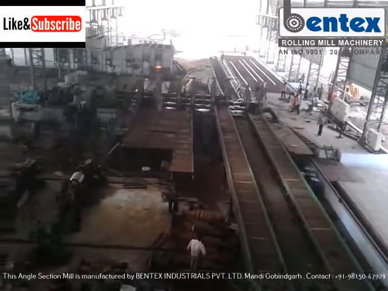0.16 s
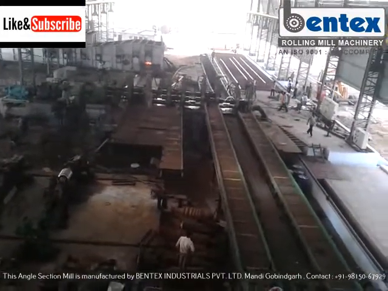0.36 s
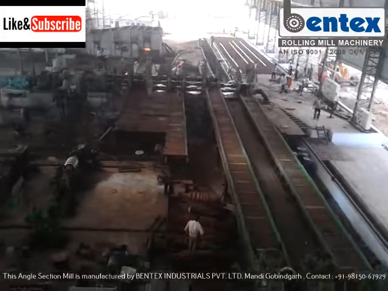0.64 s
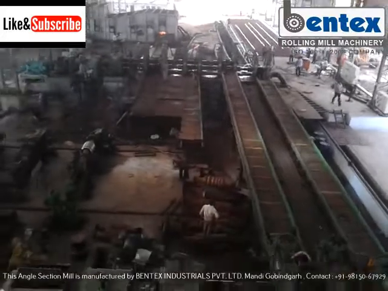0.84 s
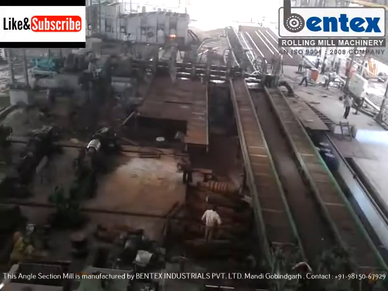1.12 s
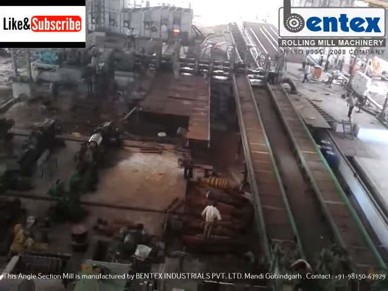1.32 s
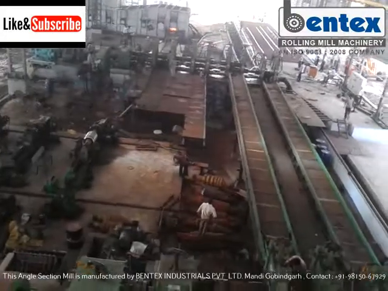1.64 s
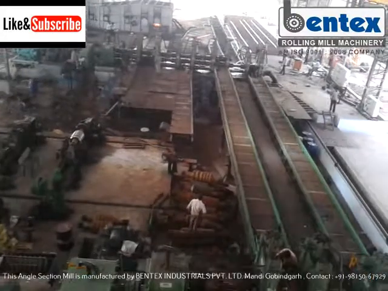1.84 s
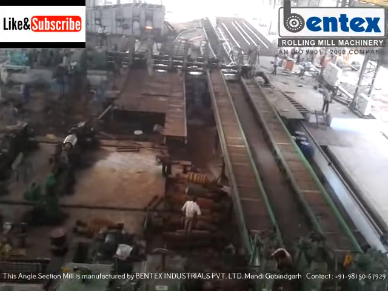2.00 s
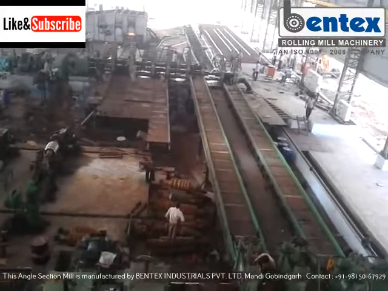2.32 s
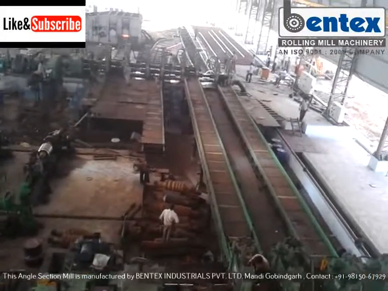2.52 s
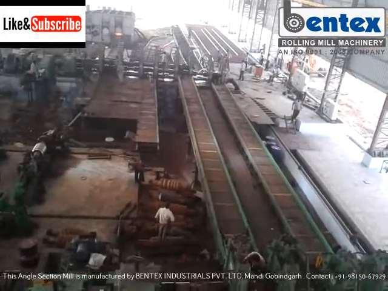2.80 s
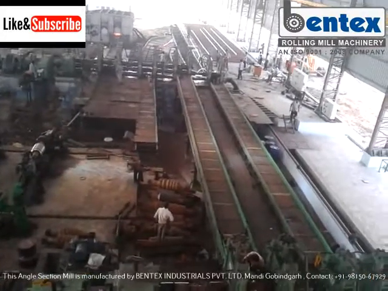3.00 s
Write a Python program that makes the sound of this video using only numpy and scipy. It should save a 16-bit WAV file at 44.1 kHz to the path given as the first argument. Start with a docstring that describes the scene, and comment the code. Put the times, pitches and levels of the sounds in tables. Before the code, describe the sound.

A steel rolling mill roars in a factory hall, with irregular metal clanks and pings.

```python
"""A steel rolling mill runs in a large factory hall, heard from high above the floor.
From the start, stands and conveyors roar, drives hum, cooling spray hisses and small impacts keep
the steel rattling. Dull knocks on the conveyors come in at once, then bright pings of steel on steel.
From 0.2 s on, loose steel clanks about twice a second, some blows in pairs, its modes smeared by
the hall's echoes. All of it passes through a narrow-band recorder that just overloads."""
import sys
import numpy as np
from scipy import signal
from scipy.fft import rfft, irfft, next_fast_len
from scipy.io import wavfile
from scipy.ndimage import uniform_filter1d

SR = 44100
rng = np.random.default_rng(int(sys.argv[2]) if len(sys.argv) > 2 else 0)


def int16_out(signal):
    """Quantize to a 16-bit WAV file."""
    q = np.round(np.clip(np.atleast_2d(signal).T, -1, 1) * 32767)
    wavfile.write(sys.argv[1], SR, q.astype(np.int16))


N = 138915


def amp(db):
    """Amplitude ratio: a factor of ten for every 20 dB."""
    return 10 ** (np.asarray(db) / 20)

def unit(x):
    """Normalisation to rms 1."""
    return x / np.sqrt(np.mean(x ** 2) + 1e-20)

def envelope(points):
    """Amplitude envelope: gain interpolated from (time [s], level [dB])."""
    return amp(np.interp(np.arange(N) / SR, *np.transpose(points)))

def response(spectrum):
    """Spectral envelope: gain as a function of frequency, interpolated on a logarithmic axis."""
    hz, db = np.transpose(spectrum)
    return lambda f: amp(np.interp(np.log(f + 1), np.log(hz + 1), db))

def coloured(x, gain):
    """Linear filtering: the spectrum of x is multiplied by gain(frequency)."""
    return irfft(rfft(x, 2 * N) * gain(np.fft.rfftfreq(2 * N, 1 / SR)))[:N]

def noise(gain):
    """Stationary noise of rms 1: white noise weighted by gain(frequency)."""
    size = next_fast_len(N, True)
    white = rfft(rng.standard_normal(size))
    return unit(irfft(white * gain(np.fft.rfftfreq(size, 1 / SR)), size)[:N])

def steadied(x):
    """Division by the running rms evens out a noise's slow swings and keeps its grain."""
    power = uniform_filter1d(uniform_filter1d(x ** 2, size=2200), size=1500)
    return unit(x / np.sqrt(abs(power) + 1e-20))

def wash(spectrum, patchy_db):
    """Random modulation: noise whose level drifts in patches of time and frequency."""
    real, imag, patches = rng.standard_normal((3, N // 256 + 5, 513))  # frames by frequency bins
    patches = unit(uniform_filter1d(uniform_filter1d(patches, size=8, axis=0), size=4, axis=1))
    frames = (real + 1j * imag) * amp(patchy_db * patches)
    patchy = signal.istft(frames.T, nperseg=1024, noverlap=768)[1][:N]
    return unit(coloured(patchy, response(spectrum)))

def ring(hz, half_width_hz):
    """Resonance in a diffuse field: echoes scramble its phase into narrow-band noise."""
    return noise(lambda f: 1 / (1 + ((f - hz) / half_width_hz) ** 2))

def tone(hz, waver_hz, flutter_db=2.5):
    """Frequency and amplitude modulation: a clear partial wavers among the echoes."""
    drift, flutter = unit(uniform_filter1d(rng.standard_normal((2, N)), size=400))
    phase = 2 * np.pi * np.cumsum(hz + waver_hz * drift) / SR
    return unit(amp(flutter_db * flutter) * np.sin(phase))

def blow(sound, start, rise_s, hold_s, t60):
    """Reverberation of an impact: echoes build to about rms 1, hold, then decay exponentially."""
    t = np.arange(N) / SR - start
    shape = np.clip(t / rise_s, 0, 1) * amp(-60 * np.maximum(t - rise_s - hold_s, 0) / t60)
    shaped = sound * shape
    return shaped * np.sqrt(np.sum(shape ** 2) / (np.sum(shaped ** 2) + 1e-20))


# hum of the drives and resonances of the stands: (frequency [Hz], half-width [Hz], level [dB])
HUM_BANDS = [(156, 5.4, -60.5), (251.3, 8.2, -40), (297.8, 7.3, -38), (553, 18, -35), (635, 16, -30.5),
             (801, 20, -31), (1002, 35, -38)]

def hum():
    """Forced vibration: the drives and stands sound in narrow, wavering bands."""
    return sum(amp(db) * ring(hz, width) for hz, width, db in HUM_BANDS)


# spectrum of the roar: (frequency [Hz], relative spectral density [dB])
ROAR_SPECTRUM = [(20, -68.5), (90, -58.5), (125, -46.5), (160, -36), (200, -20.5), (245, -18), (300, -8.5),
                 (370, -7), (470, -1), (620, -0.5), (700, -0.5), (790, -1), (900, -4), (1030, -5.5),
                 (1150, -8), (1290, -10.5), (1600, -11), (2000, -13), (2500, -18.5), (4000, -21.5),
                 (8000, -28)]
# slow swells of the roar: (time [s], level [dB])
ROAR_ENVELOPE = [(0, -15), (.42, -15.5), (.5, -17.5), (.6, -15), (.9, -17), (1.02, -17), (1.12, -14),
                 (1.36, -17), (1.43, -17.5), (1.52, -15.5), (1.8, -15), (2.1, -15.5), (2.4, -16.5),
                 (2.5, -17), (2.6, -15.5), (2.9, -15), (3, -18), (3.15, -16.5)]

def roar():
    """Broadband machine noise: stands and roller conveyors radiate a continuous spectrum."""
    return envelope(ROAR_ENVELOPE) * steadied(wash(ROAR_SPECTRUM, patchy_db=1.2))


# spectrum of the hiss: (frequency [Hz], relative spectral density [dB])
SPRAY_SPECTRUM = [(300, -39), (1500, -15), (2500, -3), (3300, -1.5), (4300, 1), (5200, 0), (6200, 0.5),
                  (7000, -1), (9000, -2.5)]
# slow swells of the hiss: (time [s], level [dB])
SPRAY_ENVELOPE = [(0, -19.5), (.25, -20.5), (.6, -19), (.95, -21), (1.25, -21), (1.42, -21.5),
                  (1.63, -19.5), (1.83, -19.5), (2.35, -20), (2.7, -20), (2.81, -19.5), (2.92, -19.5),
                  (3.15, -19.5)]

def spray():
    """Flow noise: cooling water gives an even, high-frequency hiss."""
    return envelope(SPRAY_ENVELOPE) * wash(SPRAY_SPECTRUM, patchy_db=0.5)


# modes of the steel, for rattle and clanks:
# (frequency [Hz], half-width [Hz], relative level struck [dB], relative level rattling [dB])
STEEL_MODES = [(1435, 41, 0.5, -1.5), (1736, 46, -0.5, -5), (1800, 110, -2, -1), (1881, 71, 0.5, -1),
               (2229, 33, 1, -2.5), (2442, 28, -18, -11), (2874, 97, -4.5, -6.5), (3328, 28, -11.5, -15),
               (3800, 89, -5.5, -10.5), (4200, 95, -7, -10)]

def rattle(hits_per_s=140, spread_db=5, hall_t60=0.5, level_db=-26):
    """Incoherent addition: the energies of many small impacts sum and keep the steel ringing."""
    struck = rng.random(N) < hits_per_s / SR
    hits = struck * amp(spread_db * np.minimum(rng.exponential(1, N), 3))
    tail = amp(-60 * np.arange(N) / SR / hall_t60)
    energy = abs(irfft(rfft(hits ** 2) * rfft(tail ** 2), N))
    modes = steadied(sum(amp(db) * ring(hz, width) for hz, width, _, db in STEEL_MODES))
    return amp(level_db) * unit(np.sqrt(energy) * modes)


# broad body of a knock: (frequency [Hz], relative spectral density [dB])
KNOCK_SPECTRUM = [(60, -64.5), (130, -44), (250, -15), (500, -3.5), (800, 5.5), (1100, -10.5),
                  (1500, -12.5), (2200, -16.5), (4000, -26.5), (7000, -37)]
# blows on the conveyors: (time [s], resonance [Hz], level [dB], decay time T60 [s])
CONVEYOR_KNOCKS = [(.036, 560, -19.5, 0.072), (.198, 590, -17, 0.051), (0.241, 292, -34, 0.17),
                   (0.344, 350, -30, 0.24), (.586, 487, -18, .2), (0.699, 820, -13.5, 0.21),
                   (0.774, 920, -18.5, 0.46), (0.94, 570, -13.5, .12), (1.086, 357, -25.5, .1),
                   (1.164, 586, -18, 0.085), (1.238, 910, -17, 0.2), (1.293, 536, -17, 0.11),
                   (1.679, 430, -20.5, .15), (2.227, 630, -13, 0.045), (2.389, 840, -25, 0.076),
                   (2.534, 673, -15, .08), (2.637, 1010, -19.5, 0.25), (2.803, 746, -18, 0.085),
                   (3.049, 636, -18, .12)]

def knocks(relative_width=0.096, body_db=-5):
    """Damped resonance: each dull blow on a conveyor favours the frequency of the part it hits."""
    body = amp(body_db) * noise(response(KNOCK_SPECTRUM))
    out = np.zeros(N)
    for start, hz, db, t60 in CONVEYOR_KNOCKS:
        thud = ring(hz, relative_width * hz) + body
        out += amp(db) * blow(thud, start, rise_s=0.012, hold_s=0.0069, t60=t60)
    return out


# chink of a light contact: (frequency [Hz], relative spectral density [dB])
CHINK_SPECTRUM = [(1200, -26.5), (2600, -9.5), (4200, 3.5), (7000, -0.5)]
# steel on steel: (time [s], frequency [Hz], ring level [dB], chink level [dB], ring T60 [s])
STEEL_PINGS = [(.085, 2900, -31, -43, .25), (0.176, 2845, -23, -22.5, 0.3), (.712, 2840, -35, -25, .3),
               (.855, 2930, -35, -37, 0.23), (1.238, 2825, -27, -21.5, 0.35),
               (1.753, 2885, -25, -22.5, 0.42), (2.179, 2830, -30, -21.5, 0.26),
               (2.275, 2866, -27.5, -37, .25), (2.802, 2875, -27, -16.5, .14)]

def pings(rise_s=0.013, hold_s=0.0065):
    """Impulse excitation: a brief, light contact gives a bright chink and rings one high mode."""
    chink = noise(response(CHINK_SPECTRUM))
    out = np.zeros(N)
    for start, hz, ring_db, chink_db, t60 in STEEL_PINGS:
        out += amp(ring_db) * blow(tone(hz, waver_hz=31.6), start, rise_s, hold_s, t60)
        out += amp(chink_db) * blow(chink, start, rise_s, hold_s, t60=0.14)
    return out


# crash of a clank: (frequency [Hz], relative spectral density [dB])
CRASH_SPECTRUM = [(70, -76), (150, -42), (330, -17.5), (500, -0.5), (800, 2), (980, 6.5), (1150, -12),
                  (1300, -18), (2000, -13), (2600, -23.5), (4500, -25.5), (7000, -34)]
# low, middle and high register of the steel: (lower edge [Hz], upper edge [Hz])
STEEL_REGISTERS = [(1000, 1580), (1580, 2070), (2070, 6000)]
# clanks, about one per turn of the machinery: (time [s], crash level [dB], low modes [dB],
# middle modes [dB], high modes [dB], tone level [dB], clatter duration [s])
STEEL_CLANKS = [(0.189, -24, -30.5, -22.5, -27, -27.5, 0.041), (.59, -29.5, -32, -30, -32, -33, 0.019),
                (0.677, -20.5, -25.5, -22, -25.5, -34.5, 0.074),
                (0.859, -22.5, -34.5, -29, -35, -37, 0.036),
                (1.209, -22.5, -24.5, -24.5, -28.5, -31.5, 0.14),
                (1.671, -30, -28.5, -30.5, -25.5, -31.5, 0.015), (1.742, -34, -26, -30, -34, -37, 0.052),
                (2.234, -23.5, -24.5, -18.5, -33, -23.5, 0.044), (2.763, -24, -39, -27, -26, -33, .025),
                (2.864, -32, -37, -32, -28.5, -41, .035)]

def clanks(rise_s=0.009):
    """Modal superposition: each blow on loose steel mixes its modes, a crash and one clear tone."""
    crash = steadied(noise(response(CRASH_SPECTRUM)))
    registers = []
    for low, high in STEEL_REGISTERS:
        rings = [amp(db) * ring(hz, width) for hz, width, db, _ in STEEL_MODES if low <= hz < high]
        registers.append(steadied(sum(rings)))
    clear = tone(hz=1860, waver_hz=20)
    out = np.zeros(N)
    for start, crash_db, *registers_db, tone_db, clatter_s in STEEL_CLANKS:
        modes = sum(amp(db) * register for db, register in zip(registers_db, registers))
        out += amp(crash_db) * blow(crash, start, rise_s, clatter_s, t60=0.55)
        out += np.std(modes) * blow(modes, start, rise_s, clatter_s, t60=0.45)
        out += amp(tone_db) * blow(clear, start, rise_s, hold_s=0.03, t60=0.4)
    return out


def scene():
    """Linear superposition: the pressures of all sources add at one microphone."""
    return (hum() + roar() + spray() + rattle() + knocks() + pings() + clanks())[None]


# the recorder's bass and treble roll-off: (frequency [Hz], gain [dB])
RECORDER_RESPONSE = [(0, -18), (70, -8), (130, 0), (6900, 0), (7100, -6), (7300, -17), (7500, -27),
                     (7800, -35), (8200, -38), (8900, -41), (9400, -60), (22050, -90)]

def record(dry, ceiling=0.76, cutoff_hz=15800):
    """Band limiting and overload: bass and treble roll off, peaks clip, and a low-pass follows."""
    narrow = coloured(dry[0], lambda f: amp(np.interp(f, *np.transpose(RECORDER_RESPONSE))))
    clipped = np.clip(narrow, -ceiling, ceiling)
    low_pass = signal.firwin(511, cutoff_hz, window=("kaiser", 9), fs=SR)
    return signal.oaconvolve(clipped, low_pass, "same")[None]


dry = scene()
out = record(dry)
int16_out(out)
```